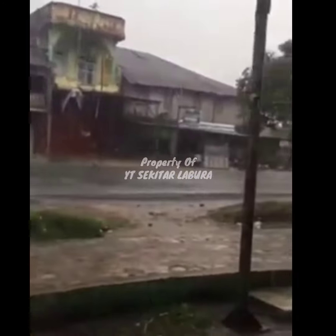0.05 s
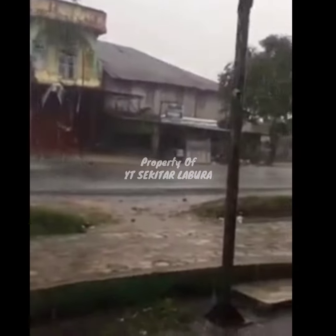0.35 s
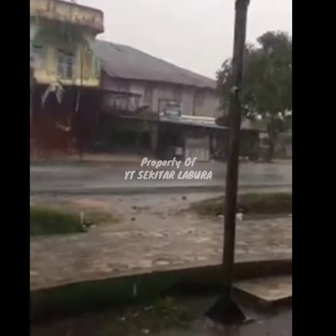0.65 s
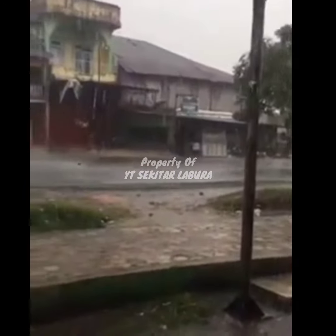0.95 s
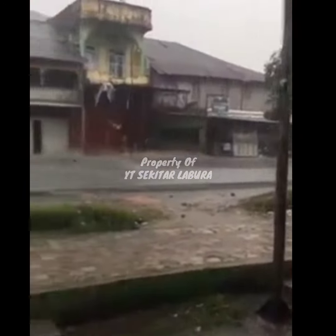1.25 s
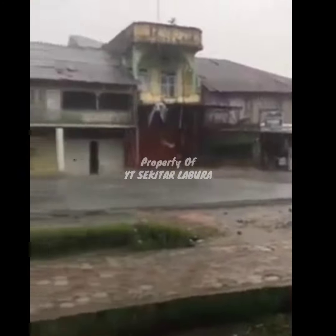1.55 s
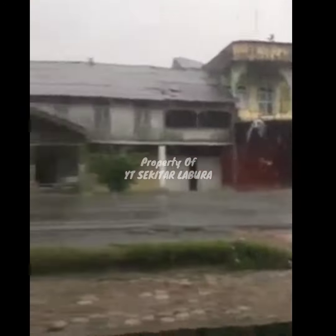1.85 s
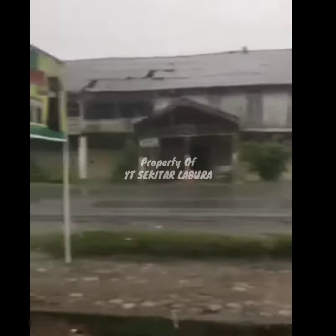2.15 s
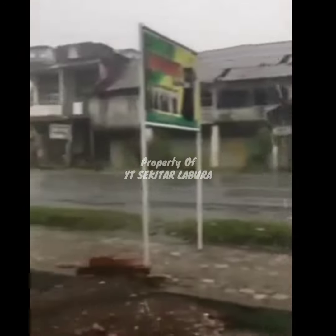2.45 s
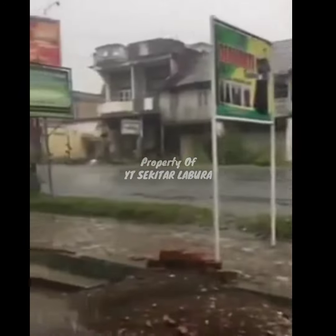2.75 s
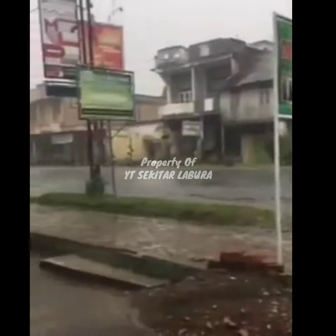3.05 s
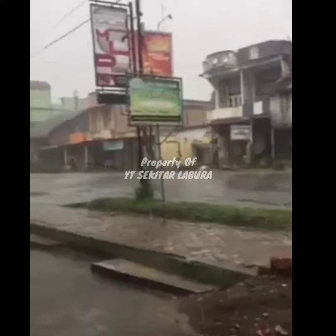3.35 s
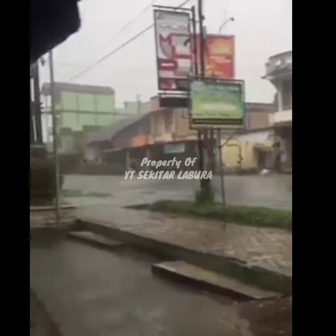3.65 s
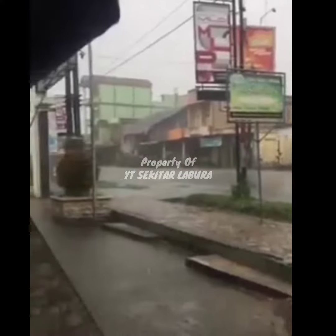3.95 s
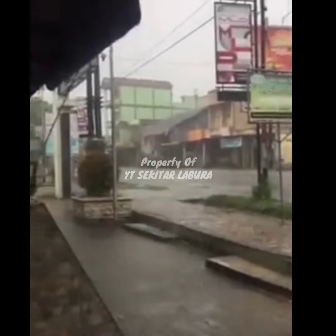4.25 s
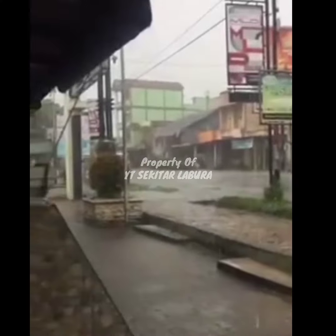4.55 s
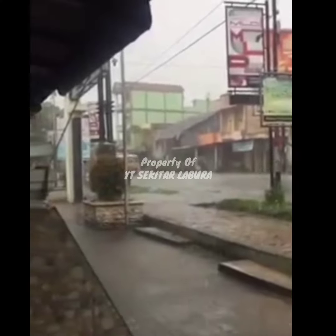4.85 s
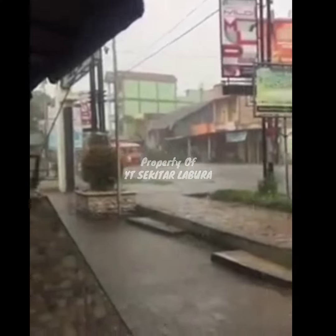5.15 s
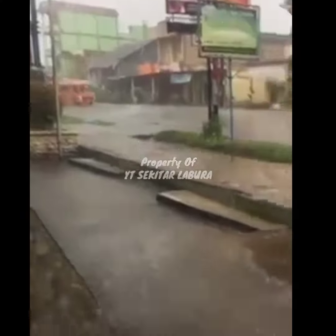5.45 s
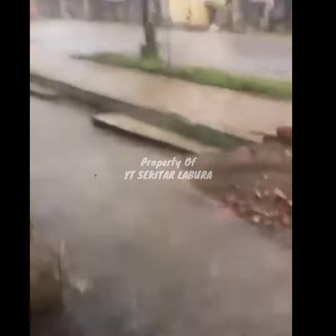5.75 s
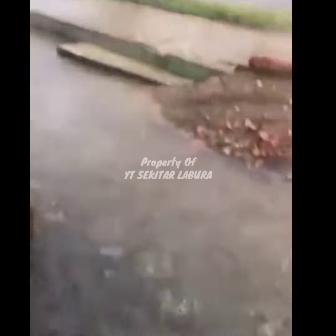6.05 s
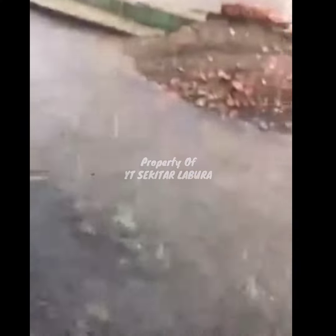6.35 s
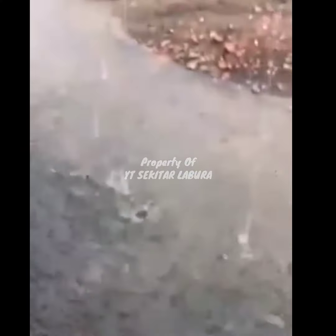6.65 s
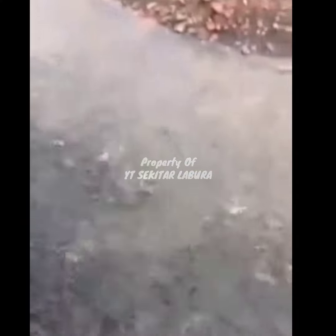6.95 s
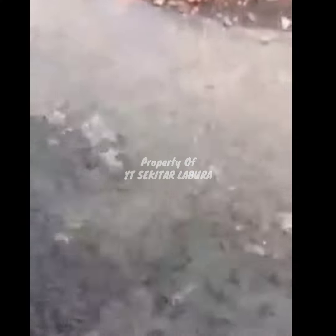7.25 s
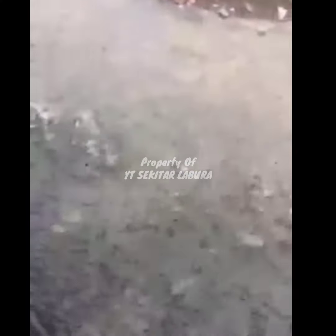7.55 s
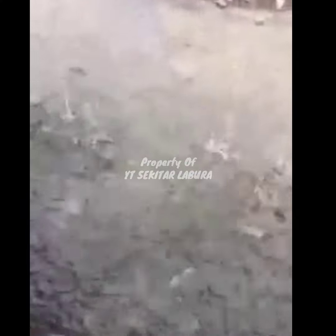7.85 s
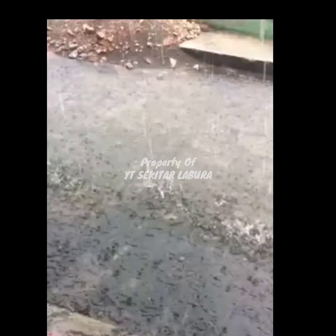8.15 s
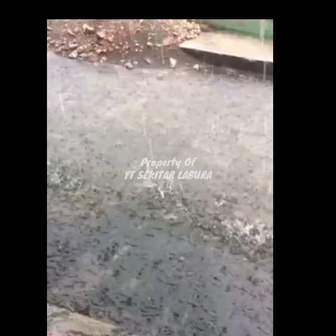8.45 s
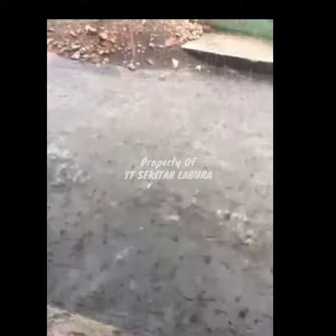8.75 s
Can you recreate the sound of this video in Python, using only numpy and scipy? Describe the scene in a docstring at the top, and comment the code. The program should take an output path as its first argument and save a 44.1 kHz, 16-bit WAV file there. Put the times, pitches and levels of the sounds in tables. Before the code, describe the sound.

A steady downpour heard from under an awning, with near drops pattering and splashing on flooded pavement.

```python
"""A street in a downpour, heard from under an awning. Rain roars on the roofs, sets the awning ringing
and hisses on the wet road. Near drops patter and click, fat drips from the eaves splash on the flooded
pavement, and far traffic hums faintly. Later, a few trapped air bubbles plop in a puddle.
Near the end the sound cuts out for a moment and fades back in, briefly a little duller."""
import sys
import numpy as np
from scipy import signal
from scipy.fft import rfft, irfft, next_fast_len
from scipy.io import wavfile
from scipy.ndimage import uniform_filter1d, map_coordinates

SR = 44100
rng = np.random.default_rng(int(sys.argv[2]) if len(sys.argv) > 2 else 0)


def digitize_waveform(pressure):
    """Quantize a signal to 16-bit integers and store it at the path in sys.argv[1].

    Rows of a 2-D input are taken as channels; values are limited to [-1, 1].
    """
    field = np.atleast_2d(pressure).T
    bounded = np.clip(field, -1, 1)
    quanta = np.round(bounded * 32767).astype(np.int16)
    wavfile.write(sys.argv[1], SR, quanta)


N = 397782
TOP_HZ = 14600  # upper edge of the treble


def amp(db):
    """Turn decibels into a number to multiply by."""
    return 10 ** (np.asarray(db) / 20)


def unit(x):
    """Scale a signal to an average strength (rms) of 1."""
    return x / np.sqrt(np.mean(x ** 2) + 1e-20)


def curves(rows):
    """Join a table's rows with straight lines: one curve for each column after the time."""
    times, *columns = np.transpose(rows)
    return [np.interp(np.arange(N) / SR, times, column) for column in columns]


def wobble(rate):
    """A smooth curve through `rate` random values a second."""
    return map_coordinates(rng.standard_normal(int(N * rate / SR) + 4), [np.arange(N) * rate / SR])


def filtered(x, response):
    """Turn each frequency of x up or down by response(hz)."""
    size = next_fast_len(len(x) + 8192)
    return irfft(rfft(x, size) * response(np.fft.rfftfreq(size, 1 / SR)), size)[:len(x)]


def shaped(x, tone):
    """Set the bass and treble of x from rows of f/Hz, level/dB."""
    freqs, db = np.transpose(tone)
    return filtered(x, lambda hz: amp(np.interp(np.log(hz + 1), np.log(freqs), db)))


def low_pass(x, edge_hz):
    """Cut away the treble above edge_hz."""
    return filtered(x, lambda hz: 1 / (1 + (hz / edge_hz) ** 120))


def rush(patchy_db):
    """Countless far drops merge into noise, with louder and softer patches in time and pitch."""
    noise = signal.stft(rng.standard_normal(N), nperseg=512)[2]
    patches = uniform_filter1d(rng.standard_normal(noise.shape), size=12, axis=0)
    patches = uniform_filter1d(patches, size=9, axis=1)
    return unit(signal.istft(noise * amp(patchy_db * unit(patches)), nperseg=512)[1][:N])


def impacts(starts, sizes, pitch_hz, cycles):
    """Each landing drop is a tiny tone that dies away in a few cycles."""
    age = np.arange(160)  # samples
    turns = pitch_hz[:, None] * age / SR
    waves = (sizes * np.sqrt(pitch_hz))[:, None] * np.sin(2 * np.pi * turns) * np.exp(-turns / cycles)
    places = (starts * SR).astype(int)[:, None] + age
    return unit(np.bincount(places.ravel(), waves.ravel(), N)[:N])


# tone of the roofs: f/Hz, level/dB
ROOF_TONE = [(25, -53), (60, -50), (88, -28.5), (112, -21), (150, -5), (240, -4.5), (290, -3.5),
             (420, -2.5), (570, -2), (800, -4.5), (1100, -11), (2000, -34.5), (4000, -61.5)]
def roofs():
    """Rain on the roofs blends into a low roar."""
    return unit(shaped(rush(patchy_db=.5), ROOF_TONE))


# the awning's hollow notes: f/Hz, half width/Hz, level/dB
AWNING_NOTES = [(284, 15, -20.5), (345, 20, -20), (407, 12, -17), (481, 29, -11)]
# boost of each note over time: t/s, then one level/dB per note, lowest first
NOTE_BOOSTS = [(0, 6, 6.5, -2, -1.5), (1.3, 3, -1, -1, 3.5), (2.0, 10, -1, -2, 1), (2.7, 10.5, 1, 3, 2.5),
               (3.4, -9, 2, 3, -2), (4.5, -10, 9, 0.5, 0), (5.8, 6, -1, 5, 5), (6.2, 1, -8.5, -4, -9),
               (7.5, 1, 0, 0, 0), (8.6, -3, 6.5, -3, -9.5)]
def awning():
    """Drumming rain keeps the sheet's low notes ringing, each swelling by itself."""
    out = np.zeros(N)
    for (centre, width, db), boost_db in zip(AWNING_NOTES, curves(NOTE_BOOSTS)):
        gain = amp(db + boost_db + 1.1 * wobble(4.4))
        ring = filtered(rng.standard_normal(N), lambda hz: 1 / (1 + ((hz - centre) / width) ** 2))
        out += gain * unit(ring)
    return out


# tone of the road: f/Hz, level/dB
ROAD_TONE = [(300, -48), (700, -2), (1000, -1), (1250, -0.5), (1600, 0.3), (1850, -3.5), (2000, -4.5),
             (2400, -8.5), (3400, -11.5), (4500, -15.5), (7000, -22), (14000, -54)]
def road():
    """Rain hisses on the wet road in small surges."""
    return unit(shaped(rush(patchy_db=.7), ROAD_TONE)) * amp(.5 * wobble(14))


# tone of the spray: f/Hz, level/dB
SPRAY_TONE = [(1500, -39), (3500, -7), (5000, -9), (6300, -1), (7800, 2), (8700, -2.5), (11500, -2),
              (14000, -5), (15000, -32)]
def spray(spurts):
    """Running water lands in spurts and breaks into fine spray."""
    return amp(0.43 * spurts) * unit(shaped(rush(patchy_db=1.67), SPRAY_TONE))


# tone of the near drops: f/Hz, level/dB
PATTER_TONE = [(500, -25.5), (1500, -1.5), (3200, 1.5), (5000, 0), (7700, 7), (8800, -12.5), (12000, 5.5),
               (14000, -8), (15000, -12.5)]
def patter(count, spread_db, cycles):
    """Single drops hit the pavement; the awning keeps them from landing very near."""
    when, distance, pitch = rng.random((count, 3)).T
    sizes = amp(spread_db * -np.log(distance + 1 / 40))  # nearer is louder
    drops = impacts(when * N / SR, sizes, 1500 * 9 ** pitch, cycles)
    return unit(shaped(drops, PATTER_TONE))


def splashes(count, spread_db, centre_hz, cycles, scatter_s=.006, droplets=40):
    """Water slaps the puddles; each slap throws up droplets of like pitch that swell and thin out."""
    when, distance, pitch = rng.random((count, 3)).T[:, :, None]
    delay = rng.gamma(2, 1, (count, droplets))
    nearness = amp(spread_db * -np.log(distance + 1 / 7))
    sizes = nearness * np.exp(-delay / 10) * rng.uniform(-0.92, 1, delay.shape)
    hz = centre_hz * 2 ** (2 * pitch - 1 + 0.21 * rng.standard_normal(delay.shape))
    starts = when * N / SR + delay * scatter_s
    return impacts(starts.ravel(), sizes.ravel(), np.minimum(hz, TOP_HZ).ravel(), cycles)


# how hard it rains: t/s, roof level/dB, road level/dB
RAIN_STRENGTH = [(0, -24.5, -24.5), (0.8, -24.5, -24.5), (1.05, -25.5, -24.5), (1.4, -24, -24),
                 (2.3, -24.5, -25.5), (3.3, -23.5, -23.5), (4.75, -23, -23), (5.3, -23.5, -24),
                 (5.75, -23.2, -23), (6.15, -24, -25.5), (6.7, -24, -24), (7.0, -24.5, -24),
                 (7.6, -22.5, -24.5), (8.4, -25.5, -26), (9.0, -24, -26)]
def rain():
    """The roar and hiss rise and fall, while the water breaking up close by stays steady."""
    roof_db, road_db = curves(RAIN_STRENGTH)
    spurts = wobble(30)
    roar = amp(roof_db + .5 + 0.19 * wobble(7.4)) * (roofs() + awning())
    hiss = amp(road_db + 0.56) * road()
    mist = amp(-2.5) * spray(spurts)
    drops = amp(-7.5) * patter(count=4500, spread_db=2.6, cycles=1.1)
    runoff = amp(-9.0) * splashes(count=400, spread_db=1.0, centre_hz=6270, cycles=3.2)
    puddles = amp(-13) * splashes(count=160, spread_db=6.5, centre_hz=3390, cycles=2.6)
    return roar + hiss + amp(-30.5) * (mist + drops + runoff + puddles)


def spatter(t, centre_hz, octaves, grain_db):
    """Droplets land in bunches, making grainy noise around one pitch."""
    band = lambda hz: 1 / (1 + (np.log2((hz + 1) / centre_hz) / octaves) ** 2) ** 2
    clumps = amp(grain_db * unit(uniform_filter1d(rng.standard_normal(len(t)), size=40)))
    return unit(filtered(clumps * rng.standard_normal(len(t)), band))


# drips from the eaves: t/s, level/dB, f/Hz, half width/octaves, time to fade by 60 dB/s
EAVES_DRIPS = [(.426, -30.5, 6100, .5, 0.096), (1.047, -27, 3100, .5, .07), (1.163, -28, 9500, .8, .06),
               (1.515, -29, 3500, .5, .09), (1.541, -27, 5600, .3, 0.13), (1.943, -26, 6900, .3, .05),
               (2.074, -22, 3260, .33, .12), (2.463, -27.5, 3300, .55, 0.12), (2.598, -24.5, 7900, .6, .07),
               (3.219, -27, 6200, .3, .06), (3.452, -23.5, 6500, .55, .08), (3.964, -23, 3300, .45, 0.11),
               (4.22, -27, 3800, .6, .07), (4.267, -29, 6000, 1, .08), (4.764, -27, 3800, .45, 0.23),
               (4.765, -29, 7000, .5, .15), (5.124, -24.5, 5500, 1.2, .06), (5.782, -26, 5600, .9, .08),
               (5.805, -26.5, 10200, .3, 0.14), (6.243, -31.5, 6200, .4, .08), (6.315, -30, 9500, .4, .08),
               (6.644, -25, 2500, .55, .12), (6.735, -27.5, 6000, .6, .08), (6.753, -19, 2850, .5, 0.12),
               (6.78, -27, 5500, 1, .08), (6.859, -25.5, 7000, .5, .08), (7.173, -36, 6000, .4, .07),
               (7.374, -22, 3100, .48, 0.15), (7.494, -29, 5000, .5, .1), (7.824, -30, 3300, 1, .12),
               (7.868, -28, 6340, .45, .07)]
def drips():
    """A fat drip bursts on the wet ground; bigger splashes sound lower and swell more slowly."""
    out, t = np.zeros(N + SR), np.arange(-SR // 50, SR // 5) / SR
    for s, db, centre_hz, octaves, fade_s in EAVES_DRIPS:
        rise_s = 0.0019 * (3000 / centre_hz) ** 0.77
        swell = np.exp(np.minimum(t, 0) / rise_s)
        fall = amp(db - 60 * np.maximum(t, 0) / fade_s)
        splash = swell * fall * spatter(t, centre_hz, octaves, grain_db=0.5)
        out[round((s + t[0]) * SR):][:len(t)] += splash
    return out[:N]


# drops on hard ground: t/s, level/dB, f/Hz, half width/octaves, time to fade by 60 dB/s
HARD_DROPS = [(.427, -17, 5600, .4, 0.0079), (.619, -18, 6400, .45, .014), (1.163, -20, 9000, .9, .014),
              (2.4615, -21, 3400, .9, .014), (2.828, -23, 6200, .4, .012), (3.002, -21, 11000, .5, .012),
              (4.161, -21, 7000, .6, .012), (4.268, -20, 7000, 1.2, .014), (5.302, -23, 11000, .5, .014),
              (5.785, -23, 7000, .5, .01), (6.2437, -17, 6200, .5, .012), (6.316, -15, 7500, 1, .012),
              (6.7522, -13.5, 2900, 1.2, 0.0071), (6.784, -22, 5200, .6, .014),
              (7.1745, -22, 5400, .4, .012), (7.863, -13.5, 5800, .55, 0.008),
              (7.9033, -19, 4500, .3, 0.012), (7.9486, -14.5, 4500, 1.8, .011)]
def ticks():
    """A drop that strikes hard ground gives one sharp click."""
    out, t = np.zeros(N + SR), np.arange(SR // 20) / SR
    for s, db, centre_hz, octaves, fade_s in HARD_DROPS:
        fall = amp(db - 60 * t / fade_s)
        click = unit(fall * spatter(t, centre_hz, octaves, grain_db=3.0))
        out[round(s * SR):][:len(t)] += np.sqrt(np.mean(fall ** 2)) * click
    return out[:N]


# hum of far engines, coming up at about 2 s: t/s, level/dB, f/Hz
ENGINE_HUM = [(0, -76, 70), (1.75, -72, 70), (2.1, -59, 73), (2.8, -62.5, 73.5), (3.6, -59.5, 75.5),
              (4.6, -57, 79), (4.8, -57, 71), (5.3, -65, 70.7), (6.2, -58.5, 71.3), (7.85, -52, 74.3),
              (8.3, -69.5, 74)]
def traffic():
    """Only the engines' firing note carries through the rain; it creeps up as each one gathers speed."""
    db, hz = curves(ENGINE_HUM)
    phase = 2 * np.pi * np.cumsum(hz * (1 + .015 * wobble(12))) / SR
    return amp(db + 1.2 * wobble(5)) * unit(np.sin(phase))


# air bubbles: t/s, level/dB, f/Hz, pitch slide/(octaves per s)
BUBBLES = [(6.644, -15.5, 1790, -3.5), (6.65, -17.5, 319, 7.5), (6.661, -13.5, 450, 4),
           (6.741, -17, 560, .5)]
def plops(rise_s=0.0077, fade_s=.11):
    """A gush of water traps air in a puddle; each bubble rings briefly and slides in pitch."""
    out, t = np.zeros(N + SR), np.arange(SR // 5) / SR
    for s, db, hz, slide in BUBBLES:
        phase = 2 * np.pi * np.cumsum(hz * 2 ** (slide * t)) / SR
        loudness = amp(db - 60 * t / fade_s) * (1 - np.exp(-t / rise_s))
        out[round(s * SR):][:len(t)] += loudness * unit(np.sin(phase))
    return out[:N]


def scene():
    """All the sounds add up in one channel."""
    return (rain() + drips() + ticks() + traffic() + plops())[None]


# change of tone after the silence: f/Hz, level/dB
RETURN_TONE = [(100, 2.5), (340, 2), (550, 1), (900, -1.5), (1500, 1.5), (2100, 3.5), (3200, 2),
               (5500, -3.5), (14000, -3.5)]
def record(dry):
    """The sound drops to silence, fades back in muffled, then clears; the highest treble is cut."""
    cut_s, return_s, fade_s, clear_s = 7.956, 8.236, .09, 8.635
    t = np.arange(N) / SR
    early = dry[0] * np.where(t < cut_s, 1, amp(-18 - 60 * abs(t - cut_s) / .05))
    fade_in = np.clip((t - return_s) / fade_s, 0, 1) ** 1.4
    late = shaped(dry[0], RETURN_TONE) * fade_in
    muffled = low_pass(late, edge_hz=8500)
    clear = np.clip((t - clear_s) / .015, 0, 1)
    return low_pass(early + clear * late + (1 - clear) * muffled, TOP_HZ)[None]


dry = scene()
out = record(dry)
digitize_waveform(out)
```